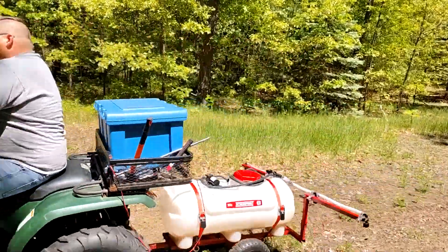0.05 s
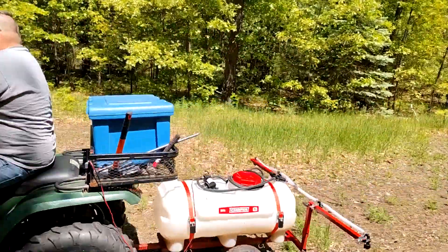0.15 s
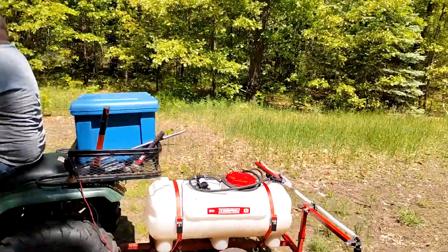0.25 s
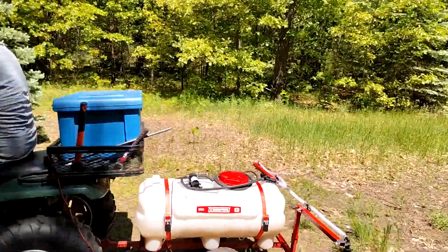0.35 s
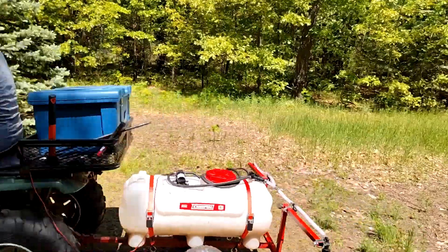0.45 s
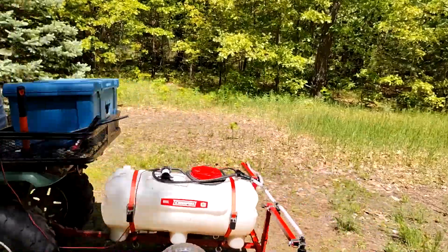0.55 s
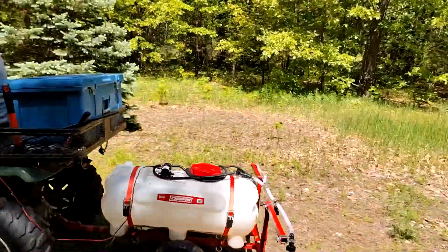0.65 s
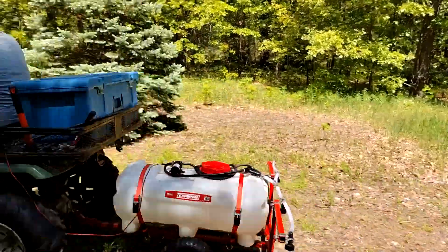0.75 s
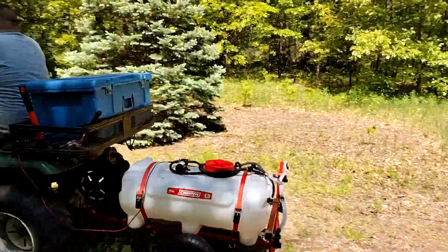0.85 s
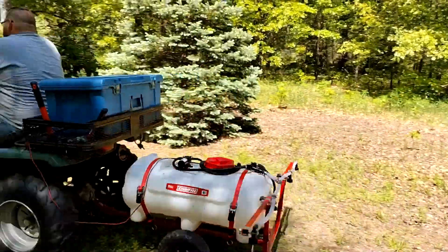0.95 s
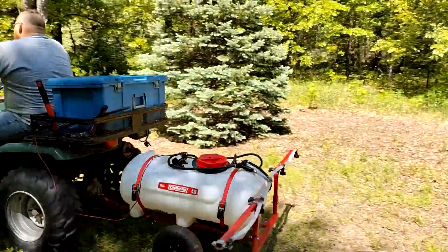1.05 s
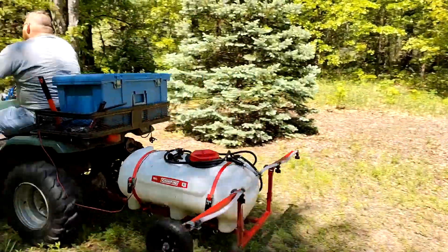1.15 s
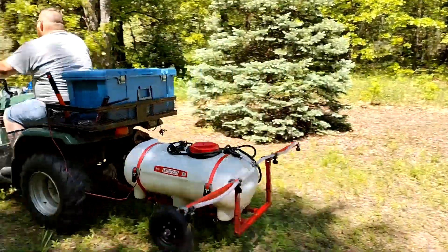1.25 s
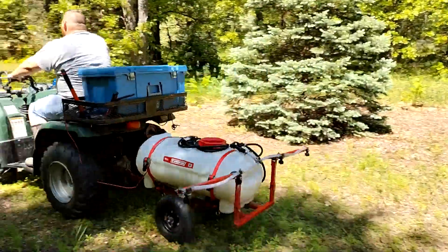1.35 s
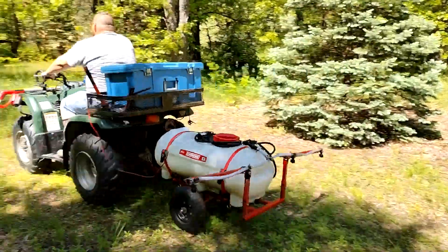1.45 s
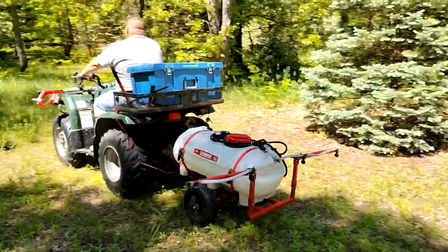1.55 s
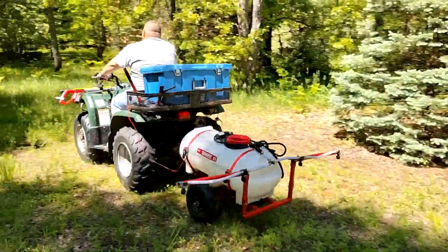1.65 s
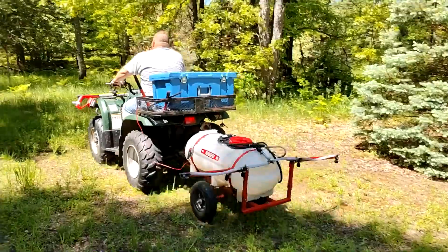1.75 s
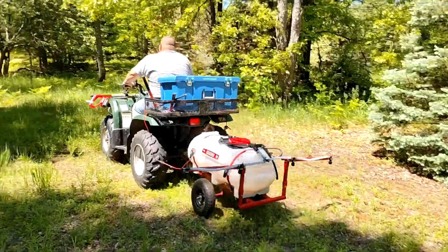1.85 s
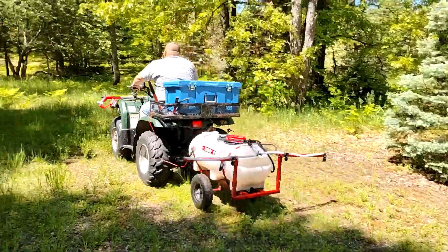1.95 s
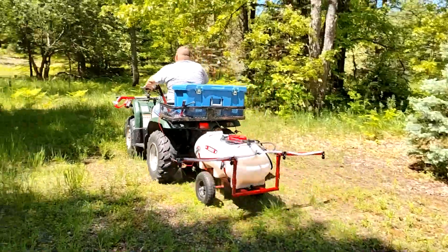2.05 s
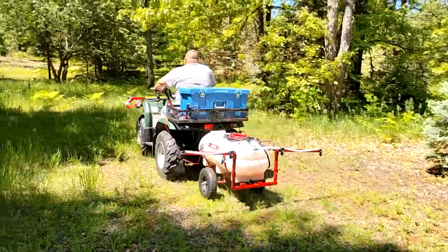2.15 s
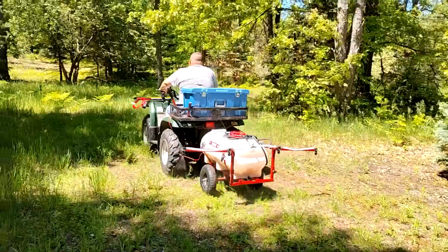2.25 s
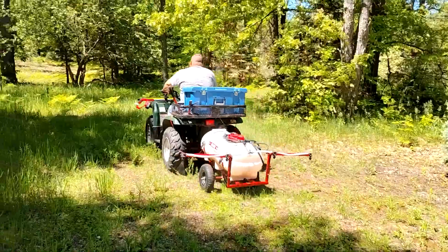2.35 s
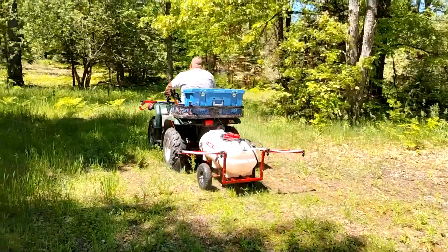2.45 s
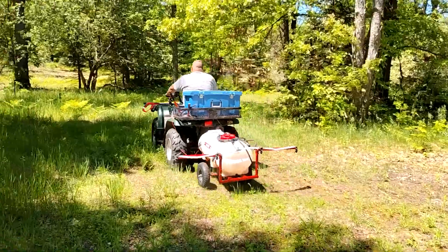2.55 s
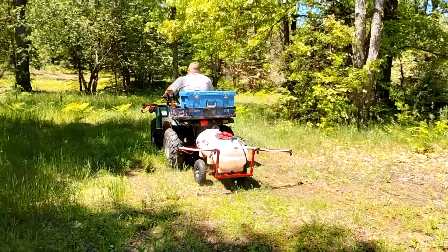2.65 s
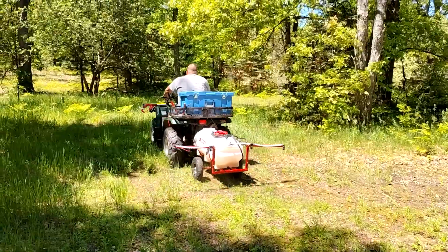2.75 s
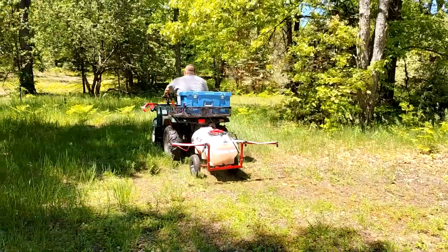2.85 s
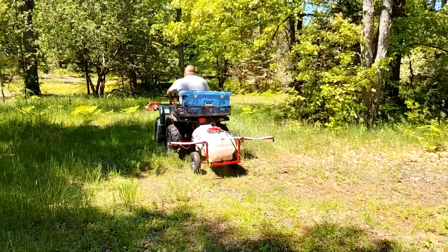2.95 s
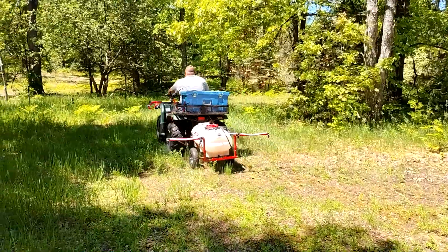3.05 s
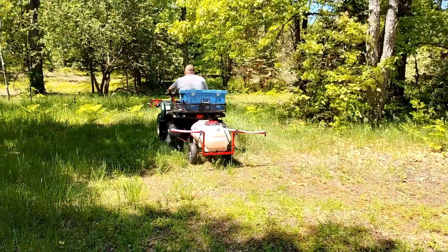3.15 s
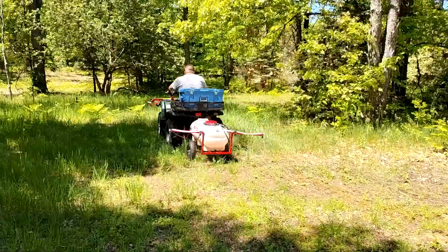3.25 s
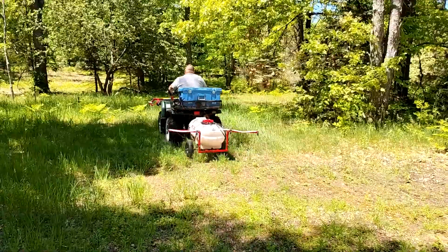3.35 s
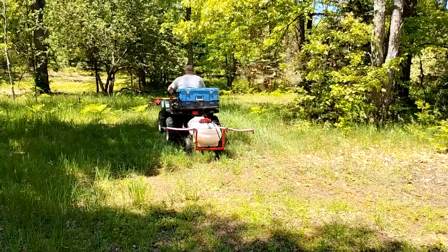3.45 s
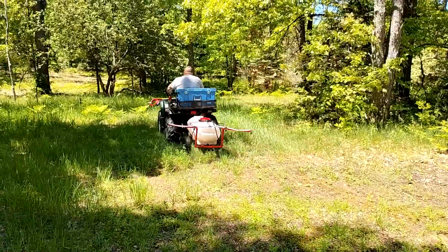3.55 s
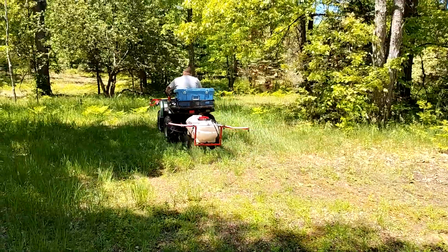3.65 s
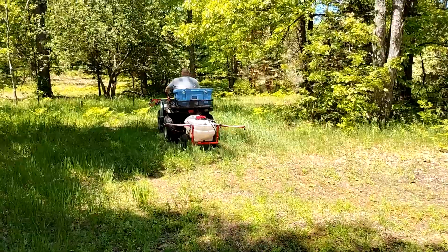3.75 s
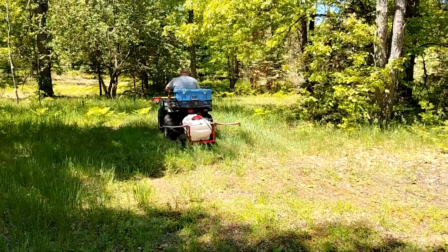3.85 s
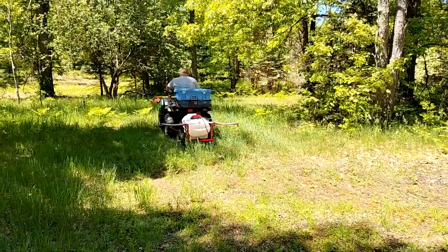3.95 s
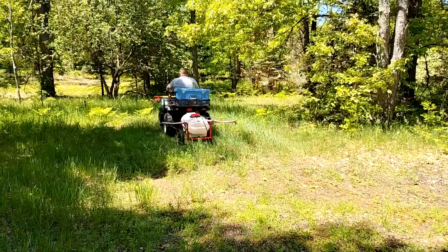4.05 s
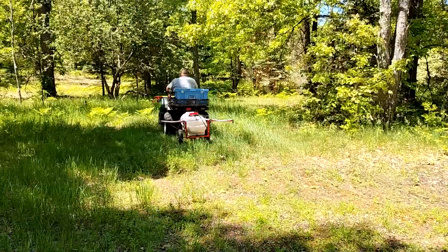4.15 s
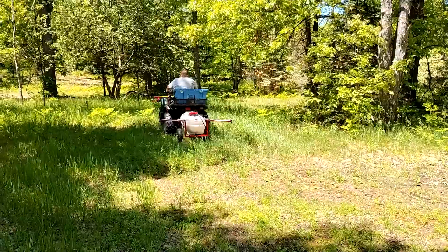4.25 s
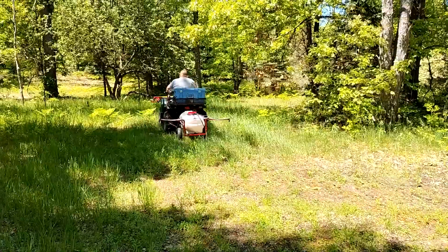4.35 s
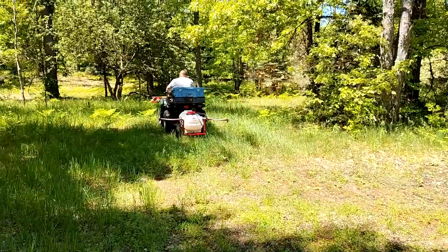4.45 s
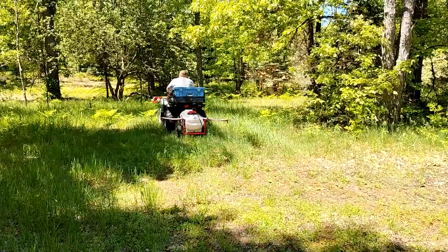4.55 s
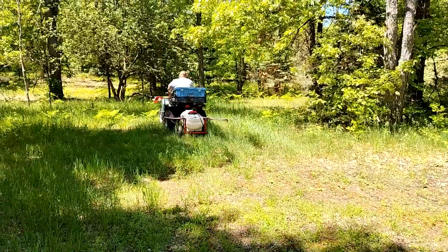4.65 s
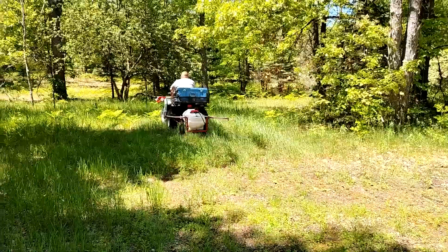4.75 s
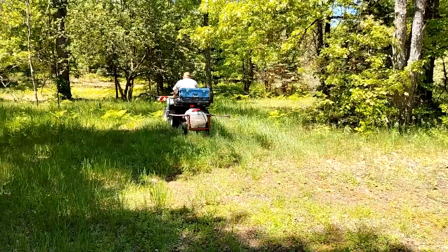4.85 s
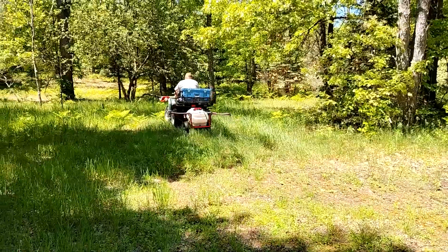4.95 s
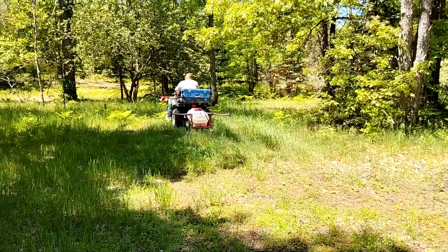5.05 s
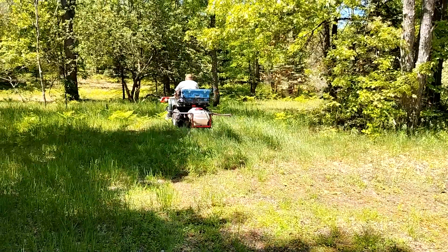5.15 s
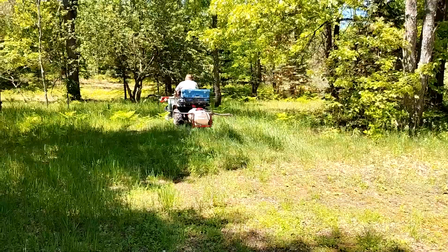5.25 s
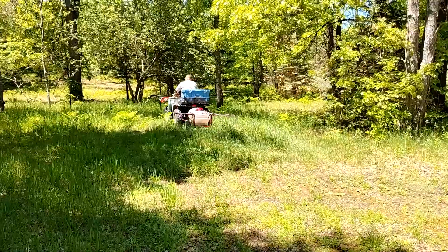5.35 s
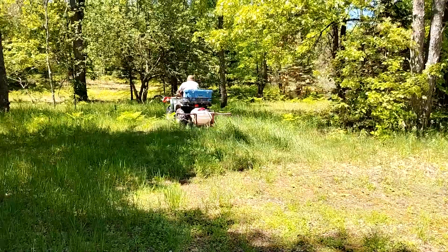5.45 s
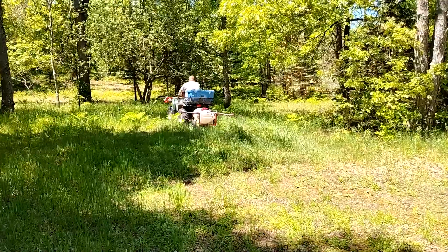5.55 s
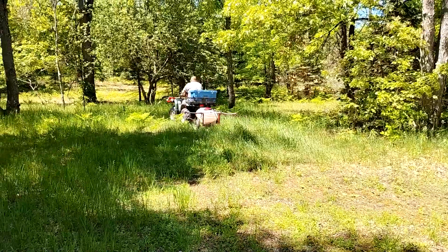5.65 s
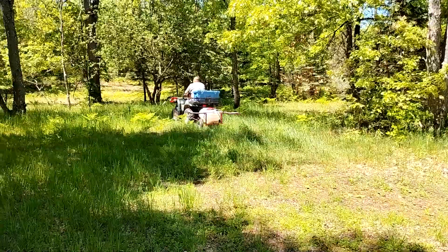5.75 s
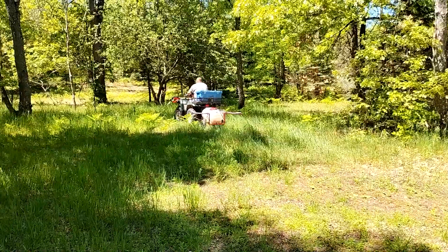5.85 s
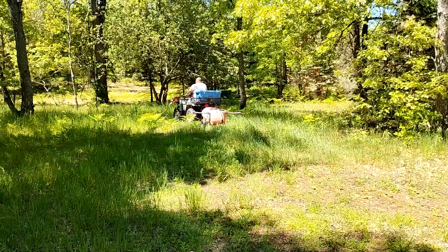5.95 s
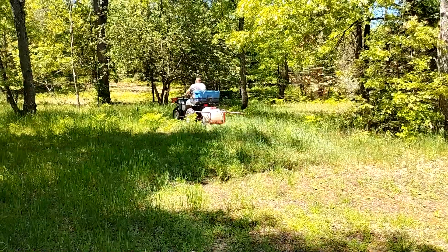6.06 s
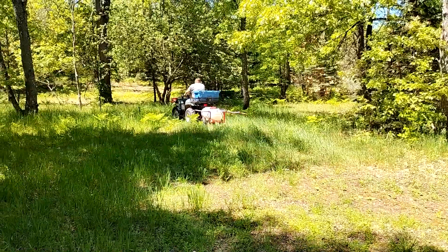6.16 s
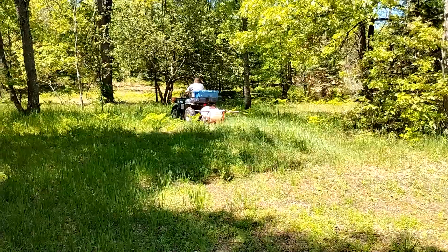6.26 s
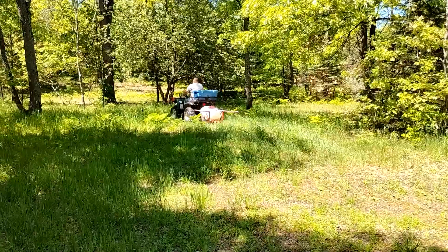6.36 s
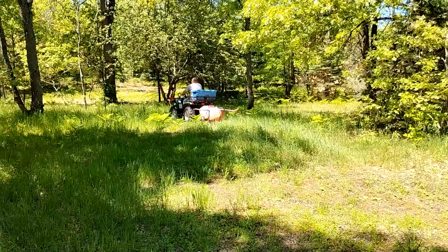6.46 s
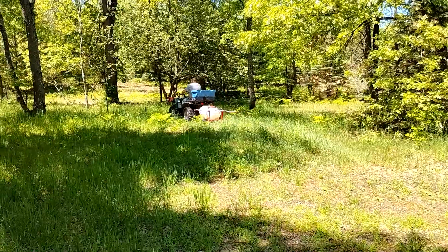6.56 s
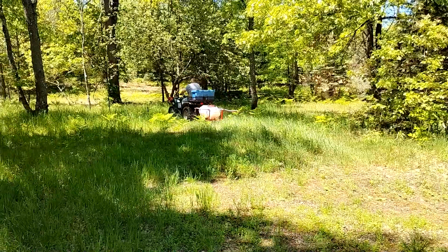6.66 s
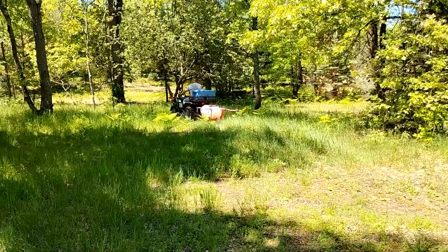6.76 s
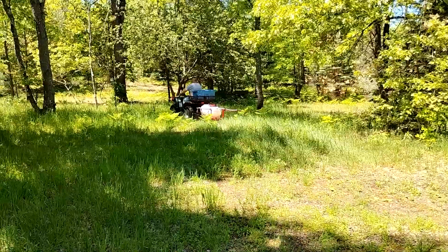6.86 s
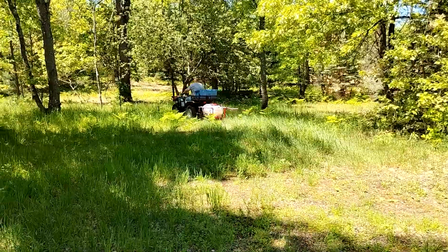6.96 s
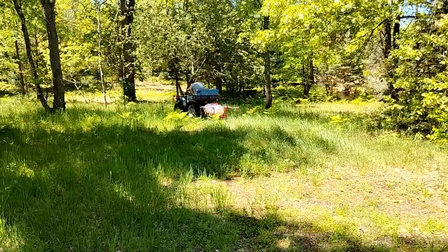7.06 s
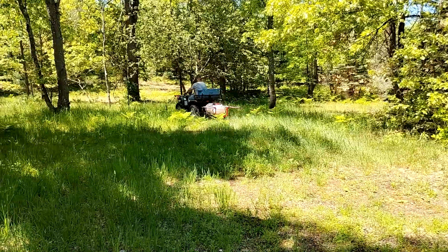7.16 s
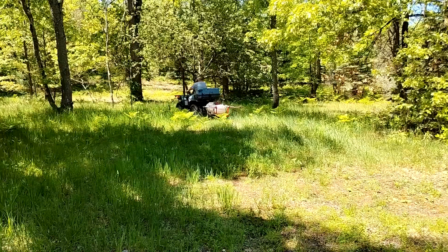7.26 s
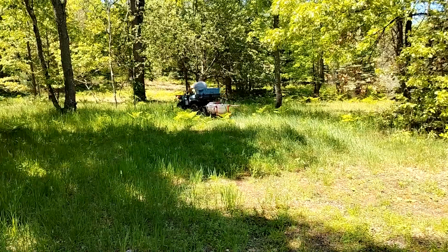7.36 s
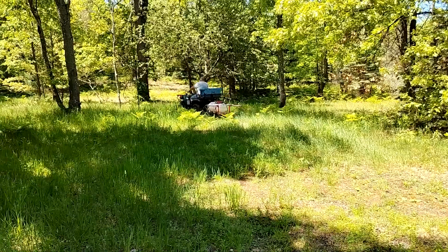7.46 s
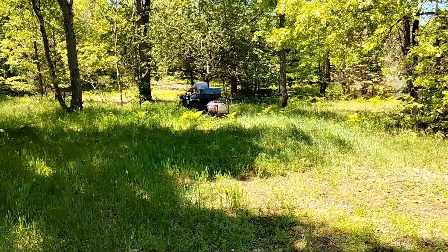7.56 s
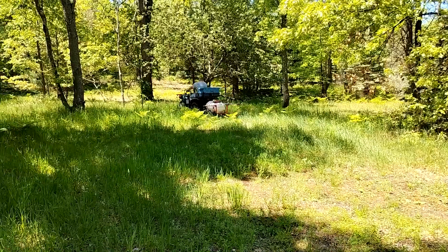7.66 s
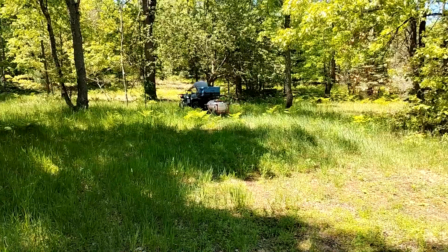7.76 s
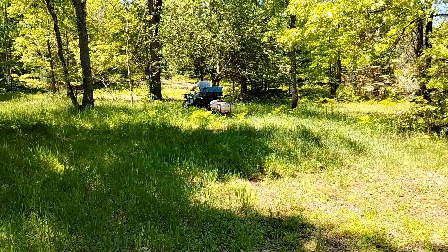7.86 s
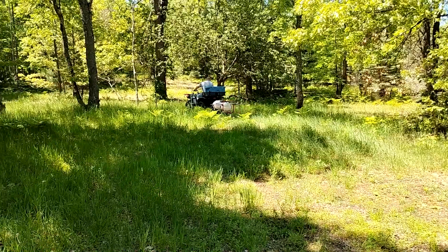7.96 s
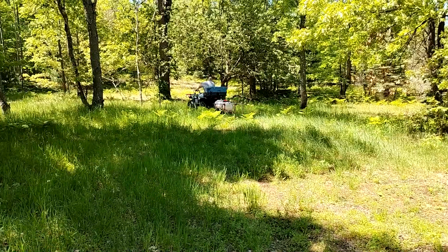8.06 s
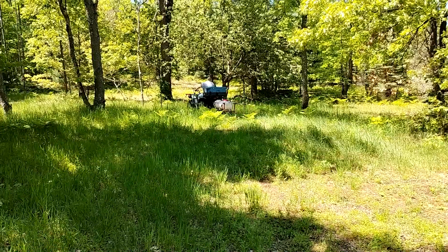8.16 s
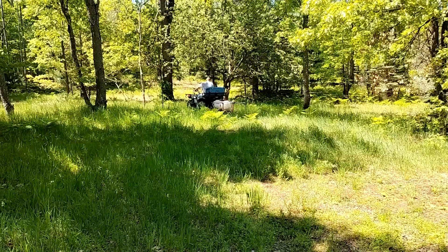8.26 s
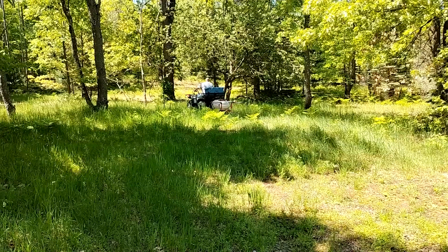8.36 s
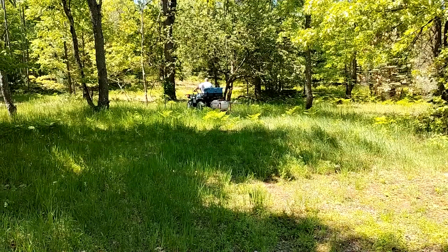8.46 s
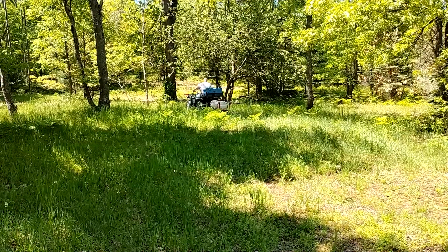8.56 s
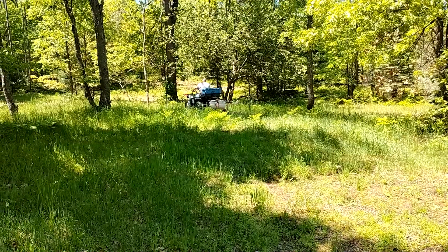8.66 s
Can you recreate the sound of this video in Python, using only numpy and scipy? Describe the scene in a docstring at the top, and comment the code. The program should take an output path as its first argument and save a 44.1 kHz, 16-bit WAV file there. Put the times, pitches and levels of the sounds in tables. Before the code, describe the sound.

A quad bike putters past close by, towing a clanking, rattling metal trailer over grass, then fades into the distance.

```python
"""On a meadow a single-cylinder quad bike tows a small steel trailer away from a phone with two microphone ports.
Each firing sends pressure pulses through silencer resonances: a boom, a short bark and rasping gas.
Shaped noise makes casing drone, valve clatter, belt churr, tyre wash and rumble; wavering sines are the gears.
The loose trailer clanks and rattles: scrape bursts excite noise and the ringing modes of a steel frame."""
import sys
import numpy as np
from scipy import signal
from scipy.fft import rfft, irfft
from scipy.io import wavfile
from scipy.ndimage import uniform_filter1d, map_coordinates

SR = 44100
rng = np.random.default_rng(int(sys.argv[2]) if len(sys.argv) > 2 else 0)


def master(y):
    """Save y as 16-bit WAV."""
    cut = np.clip(np.atleast_2d(y).T, -1, 1)
    pcm = np.round(cut * 32767)  # scale
    wavfile.write(sys.argv[1], SR, pcm.astype(np.int16))


N = 384552

# Noise colours: (frequency [Hz], relative density [dB])
RUMBLE_COLOUR = [(15, -21), (25, -19), (40, -11), (55, -8), (70, -5), (85, 1.5), (110, -33.5)]  # tyres on turf
WASH_COLOUR = [(2500, 2.5), (3200, 2.5), (4000, -7), (4500, -1), (5200, 2.5), (6200, -2.5), (7000, -11.5),
               (8000, -39.5)]  # tyre hiss
DRONE_COLOUR = [(200, -41), (300, 0), (420, 3), (500, 3), (590, -1.5), (700, 2), (900, -0.5), (1150, -22)]  # engine casing
CLATTER_COLOUR = [(600, -35), (780, -11), (1000, -6), (1230, -11), (1530, -2), (1780, -6), (2110, 2),
                  (2350, -6), (2600, -3), (2900, -10), (3300, -18), (4200, -22), (5500, -45)]  # valves, and the knock of the trailer
CHURR_COLOUR = [(550, -31.5), (680, -7.5), (800, -5.5), (1000, 0.5), (1180, -9.5), (1380, -1), (1600, -39),
                (1900, -43)]  # drive belt
SIZZLE_COLOUR = [(6500, -38), (7500, -19), (7800, -2.5), (8300, -2), (8850, -6), (9150, -22.5),
                 (10000, -8.5), (11000, -25.5)]  # bright hiss in two bands
JANGLE_COLOUR = [(3000, -42.5), (3600, -12.5), (4400, -15), (5600, -16), (6300, -9), (7000, -5.5),
                 (7500, -6), (8100, -1.5), (8800, -6.5), (9250, -9), (10000, -10), (10800, -14.5),
                 (11800, -17.5), (13000, -20.5), (14100, -28)]  # loose steel
RASP_COLOUR = [(70, -16), (110, -28), (170, -2), (220, 2.5), (330, -0.5), (440, -8), (530, -48)]  # gas behind each firing
# Port colouring: (frequency [Hz], left minus right [dB])
PORT_DIFFERENCE = [(500, 0), (1000, -3), (1500, -4), (2100, 0.12), (2700, 5.32), (3500, -2), (5000, 0.15),
                   (6300, 0.1), (7000, 3.9), (8300, 12.4), (10000, 12.7), (12000, 12), (13300, 0.9),
                   (14200, 2.78)]
# Likeness of noise at the two ports: (frequency [Hz], correlation [0-1])
PORT_LIKENESS = [(30, 0.93), (70, .99), (300, 0.99), (550, .94), (800, 0.85), (1200, 0.74), (2200, 0.66),
                 (3500, .42), (6000, .3), (9000, 0.1)]
# Quad drawing away: (time [s], relative boom level [dB], fade of the running gear [dB])
AWAY = [(0, -15, -1), (.6, -18, -1.5), (1.2, -18.5, -2), (1.9, -18.5, -6.5), (2.4, -17.5, -7.5),
        (2.9, -18.5, -11), (3.3, -22, -13.5), (3.7, -23.5, -16), (4.2, -28, -21.5), (4.8, -28.5, -28),
        (5.4, -30.5, -21.5), (6.2, -31.5, -24), (7.4, -32.5, -24), (8.66, -35, -27.5)]
# Quad turning its tail to the phone: (time [s], lead of the left port [ms], tail pipe shading [dB],
# low-mid lift [dB], growl lift [dB], stereo width [dB])
BEARING = [(0, 0.25, -8, 1, 9.5, 6.5), (.4, 0.21, -11, 4, 7.5, 6.5), (.8, 0.26, -13.5, 8, 9, 7),
           (1.2, 0.17, -1.5, 7, 0.5, 2.5), (1.65, 0.024, -6.5, 9.5, 0.5, 2), (2.5, .02, -1, 2, -2, -1),
           (3.5, -0.074, -1, 3, 0, 2.5), (4.15, -0.0098, 2, 4.5, 1, 2), (4.9, -0.027, 0, 1.5, -2, 0.5),
           (5.6, -0.044, -3, 4.5, 6, 2.5), (6.7, 0.066, 1.5, 3, 3, 1.5), (8.66, -0.069, -3, 5.5, 1, 3)]
# Rough ground that shakes everything loose: (centre [s], half length to 1/e [s], rise [dB])
ROUGH_GROUND = [(1.015, 0.11, 0), (2.306, 0.18, 3.5), (4.599, 0.13, 10.5), (5.09, 0.16, 6.5),
                (6.669, 0.15, 14)]
# Gear whine: (time [s], pitch [Hz], relative level [dB])
GEAR_WHINE = [(0, 1065, -23), (.12, 1061, -38), (.3, 1055, -32), (.5, 1065, -26), (.56, 1040, -28),
              (.61, 1098, -35), (.78, 1110, -28), (.95, 1143, -41.5), (1.05, 1157, -55), (2.25, 1030, -63),
              (2.4, 1015, -35.5), (2.5, 1008, -43), (2.7, 1015, -34.5), (2.85, 1040, -46), (2.95, 999, -33),
              (3.1, 990, -36), (3.25, 998, -35.5), (3.58, 970, -36), (3.66, 967, -48), (3.9, 958, -43),
              (3.97, 945, -50), (4.2, 917, -60), (8.66, 900, -80)]
# Two lower gear tones, heard only from the side, each: (time [s], pitch [Hz], relative level [dB])
LOW_GEAR_WHINES = [
    [(0, 660, -52), (.2, 721, -33), (.35, 680, -39), (.5, 650, -56), (.7, 686, -33), (.8, 664, -29),
     (1, 662, -41), (1.25, 660, -77), (1.5, 660, -100)],
    [(0, 960, -67), (.33, 962, -56), (.43, 995, -29), (.55, 984, -34), (.7, 1000, -37), (.9, 990, -68.5),
     (1.1, 995, -100)],
]
# Trailer clanks: (time [s], relative peak [dB], knock over jangle [dB], relative burst length [ms],
# pitch near which the struck member rings [Hz])
CLANKS = [(0.278, -25, 2, 7.7, 1780), (0.328, -11, -7.5, 4, 1780), (0.6166, -17.5, -13, 9.8, 1950),
          (0.663, -16, -24, 2.7, 1700), (0.941, -4, -13.5, 2.3, 2080), (0.999, -35, -6, 7.8, 2060),
          (1.0884, -8.5, -9, 5.5, 2200), (1.2001, 1.5, -17.5, 2.5, 1780), (1.387, -16, -9, 14.3, 2230),
          (1.4442, -20.5, -16, 11, 1650), (1.482, -24, -9, 6, 2100), (1.505, -17, -9, 8, 2210),
          (1.619, -44, 2, 5.4, 1600), (1.6625, -15.5, -5.5, 6.9, 2380), (1.883, -48, -2, 3.6, 1300),
          (1.942, -1.5, -9.5, 4.3, 1995), (1.9815, -12, -14, 6.7, 2140), (2.005, -15, -13, 8.8, 2160),
          (2.028, -5.5, -12, 4.1, 2200), (2.074, -21.5, -4.5, 7.9, 1480), (2.134, -11, -16, 4.9, 1970),
          (2.193, -22, -11, 5, 2100), (2.265, -26, -15, 6.0, 1500), (2.311, -14.5, -13, 7.7, 2080),
          (2.374, -8, -22, 4.3, 1498), (2.435, -10, -11.5, 6.1, 2210), (2.5, -36, -0.0, 5.4, 2370),
          (2.53, -14, -17, 6.9, 1800), (2.5557, -10.5, -18, 2.8, 2400), (2.6647, -22, -12, 6.8, 1390),
          (2.697, -21, -16, 4.3, 1820), (2.764, -8, -14.5, 3.1, 2340), (2.926, -25.5, -8, 5.7, 2130),
          (3.1058, -20, -15, 12.4, 2440), (3.179, -30, -18, 5.8, 1790), (3.238, -20.5, -15, 9.1, 1750),
          (3.637, -35, -6, 6.0, 1070), (3.739, -30.5, -17, 8.5, 1070), (3.894, -26.5, -9.5, 8.2, 2231),
          (3.962, -44, 1, 5.3, 2080), (4.122, -48, 5, 6.0, 1404), (4.249, -36.5, -10, 8.2, 1395),
          (4.366, -29.5, -9, 7.5, 1280), (4.488, -32, -11.5, 12, 1470), (4.502, -32, -12, 7.8, 2060),
          (4.591, -27.5, -14.5, 10.5, 2170), (4.624, -27, -20, 6.1, 2560), (4.665, -36.5, -8.5, 16, 1060),
          (4.701, -43, 0.5, 9.1, 1480), (4.756, -49.5, 9, 4.1, 1440), (4.818, -42, -1, 7, 1500),
          (4.957, -33.5, -8.5, 10, 2510), (4.994, -32.5, -18, 23, 2660), (5.0524, -34.5, -10.5, 24, 2150),
          (5.2, -25.5, -14, 6.7, 2540), (5.263, -29, -13.5, 8.6, 2580), (5.2843, -33, -25, 8.9, 2270),
          (5.3048, -29.5, -10, 10, 2110), (5.347, -27, -20, 11.5, 1970), (5.441, -34.5, -11, 12, 1940),
          (5.7323, -28, -9.5, 4.6, 2120), (5.7772, -39.0, -15, 12, 1940), (6.1237, -38, -6, 6, 2000),
          (6.1894, -37, -18, 3.7, 1520), (6.4485, -33.5, -6.5, 10, 2460), (6.527, -25.5, -12, 8.2, 2230),
          (6.578, -27.5, -16, 7.6, 2640), (6.61, -36, -13, 5.4, 1990), (6.6758, -29, -12, 8.6, 2520),
          (6.79, -36, -18, 8.1, 1410), (6.806, -34, -13, 15.5, 2600), (7.025, -35, -8.5, 6.8, 2540),
          (7.193, -35.5, -8.5, 13, 2100), (7.211, -38, -12.0, 6.9, 2050), (7.463, -52, -2, 7.2, 2130),
          (7.6766, -45, -3, 5.6, 2510), (8.0253, -35, -6.5, 4.9, 2070), (8.5048, -36.5, -6.5, 5.9, 2030),
          (8.611, -40.5, -6.5, 23, 2540)]
# Steel frame modes: (frequency [Hz], relative level [dB], ring time to -60 dB [s])
FRAME_MODES = [(1070, -7, .06), (1290, -6, .07), (1390, -8, .09), (1480, -5, .07), (1600, -9, .06),
               (1780, -7, .06), (1950, -3, .06), (2100, -1, .07), (2150, -1, .07), (2230, -4, .06),
               (2380, -6, .06), (2540, -6, .05), (2640, -8, .04), (3200, -12, .04), (6600, -6, .03),
               (7300, 0, .03), (8050, 0, .04), (8500, -3, .04), (10100, -8, .03)]
# Engine speed: (time [s], firing rate [Hz])
FIRING_RATE = [(0.0, 27.58), (0.3, 27.04), (0.6, 27.61), (0.9, 27.65), (1.2, 27.07), (1.5, 26.77),
               (1.8, 27.12), (2.1, 26.71), (2.4, 25.37), (2.7, 25.85), (3.0, 25.42), (3.3, 25.3),
               (3.6, 25.01), (3.9, 24.52), (4.2, 24.16), (4.5, 24.28), (4.8, 23.94), (5.1, 24.4),
               (5.4, 23.59), (5.7, 23.2), (6.0, 23.18), (6.3, 23.14), (6.6, 23.56), (6.9, 23.27),
               (7.2, 23.86), (7.5, 23.24), (7.8, 22.9), (8.1, 23.56), (8.4, 23.15), (8.72, 24.0)]
# Hum on a multiple of the firing rate: (time [s], level before its waver [dB])
ENGINE_HUM = [(0, -55), (1, -50), (1.25, -32), (1.6, -40.5), (1.8, -35), (2, -32.5), (2.4, -35.5), (3, -49),
              (3.5, -56), (4.5, -46), (5, -70), (8.66, -62)]
# Bark coming back off trailer, ground and trunks: (delay [ms], level before its drift [dB])
SCATTER = [(7, -8), (17, -5), (24, -7), (31, -6.5), (47, -10)]

# Noise levels: (level before any fade [dB], dB per dB of running-gear fade)
RUMBLE_LEVEL, WASH_LEVEL, DRONE_LEVEL = (-28.5, 1.21), (-24.5, 2.11), (-26, 1.49)
CLATTER_LEVEL, SIZZLE_LEVEL, RATTLE_LEVEL = (-25.5, 1), (-37, 0.65), (-24, 1.323)
FAR_WASH_DB = -60.5  # grass keeps rustling once the tyres are out of earshot
ROUGH_CLATTER, ROUGH_WASH = 0.49, 0.78  # share of the rough-ground rise
LOAD_ENDS_S = 4.56  # churr and sizzle die faster from here
CHURR_DIES_DB_PER_S, SIZZLE_DIES_DB_PER_S = 13, 6
PATCHY_DB = 2.0  # spread of the flutter in each narrow band
BOUNCE_MS, BOUNCE_DB = (5, 16), (-2, -12)  # ranges of delay and level for the one bounce of each clank

# Resonances: (centre [Hz], width [Hz])
HEADER, CHAMBER, TAIL_PIPE = (160, 102), (110.2, 9), (223, 50)
LOW_MIDS, GROWL, SUB = (195, 80), (325, 35), (92.6, 8.3)
TAIL_PIPE_DB, SUB_LIFT_DB = -0.5, 2.1
BOOM_LAG_MS = .4
BARK_HALF_WIDTH_MS = 1.323  # slug of gas at the outlet, centre to zero crossing
ECHO_MS, ECHO_GAIN = 12.9, -0.3  # the slug returns inverted from the silencer's far end
BARK_DB, RASP_DB, CHURR_DB, CRANK_DB = -5, -15.5, -19, -31  # relative to the boom
SCATTER_DRIFT_DB = 4  # each echo swells and sinks as the quad moves
HUM_ORDER = 10
BASS_LEAD = .7  # share of the port lead that is left in the exhaust note

AIR_HZ, AIR_SHARE = 10980, 0.54  # above this the air takes a further share of the fade
END_S, TOP_HZ = 8.659, 15466


def undb(db):
    """Gain of a level in dB."""
    return 10 ** (np.asarray(db) / 20)


def unit(x):
    """Scaled to rms 1."""
    return x / np.sqrt(np.mean(x ** 2))


def curves(table):
    """Each column of a timed table as one value a sample."""
    s, *columns = np.transpose(table)
    return [np.interp(np.arange(N) / SR, s, c) for c in columns]


def over_hz(table):
    """A frequency table read at every bin, straight on a log axis."""
    hz, value = np.transpose(table)
    bins_hz = np.arange(N // 2 + 1) * SR / N
    return np.interp(np.log(bins_hz + 1), np.log(hz), value)


def walk(rate):
    """Random levels held 1 / rate s and smoothed twice, with rms 1."""
    k = int(SR / rate)
    steps = np.repeat(rng.standard_normal(N // k + 1), k)
    return unit(uniform_filter1d(uniform_filter1d(steps, k), k)[:N])


def hiss(colour):
    """Coloured noise at both ports, alike in the bass and nearly unrelated in the treble."""
    mid, side = rfft(rng.standard_normal((2, N)))
    alike = np.clip(over_hz(PORT_LIKENESS), 0, 1)
    pair = np.sqrt(1 + alike) * mid + np.sqrt(1 - alike) * side * np.array([[1], [-1]])
    return unit(irfft(pair * undb(over_hz(colour)), N))


def ring(x, hz, width_hz):
    """Two-pole resonance, gain 1 at the centre."""
    return signal.lfilter(*signal.iirpeak(hz, hz / width_hz, fs=SR), x)


def lift(x, db, hz, width_hz):
    """Raises or lowers one resonant band by db."""
    return x + (undb(db) - 1) * ring(x, hz, width_hz)


def highpass(x, order, hz):
    """Removes what lies below hz, run both ways so that nothing is delayed."""
    return signal.sosfiltfilt(signal.butter(order, hz, "highpass", fs=SR, output="sos"), x)


def delayed(x, ms):
    """Shifted later by ms, wrapping round the end."""
    return np.roll(x, int(ms * SR / 1000))


def patchy(x, db):
    """Lets narrow bands swell and drop on their own, so that the colour shifts and flutters."""
    bands = signal.stft(x, nperseg=512)[2]
    field = rng.standard_normal(bands.shape[1:])
    field = uniform_filter1d(uniform_filter1d(field, size=3, axis=0), size=4, axis=1)
    return signal.istft(bands * undb(db * unit(field)), nperseg=512)[1][:, :N]


def place(pair, lead_ms, width_db):
    """Widens a pair and lets the left port hear it earlier by the lead."""
    mid = (pair[0] + pair[1]) / 2
    side = undb(width_db) * (pair[0] - pair[1]) / 2
    shift = lead_ms * SR / 2000  # half the lead on each port, in samples
    return np.array([map_coordinates(mid + k * side, [np.arange(N) + k * shift], mode="mirror")
                     for k in (1, -1)])


def tyre_rumble(db):
    """Low noise of tyres rolling on turf."""
    return undb(db) * hiss(RUMBLE_COLOUR)


def tyre_wash(db):
    """Tyres hissing through grass, wavering slightly."""
    return undb(db + 1.2 * walk(30)) * hiss(WASH_COLOUR)


def casing_drone(db, throb):
    """Noise from the engine casing that swells a little with each firing."""
    return undb(db + 1.2 * walk(18)) * (1 + .2 * throb) * hiss(DRONE_COLOUR)


def valve_clatter(db, throb):
    """Fast-flickering noise that swells a little with each firing."""
    return undb(db + 1.2 * walk(120)) * (1 + .15 * throb) * hiss(CLATTER_COLOUR)


def belt_churr(db):
    """Steady mid-band noise of the drive belt."""
    return undb(db) * hiss(CHURR_COLOUR)


def sizzle(db):
    """Bright hiss with a flickering level."""
    return undb(db + 3.1 * walk(60)) * hiss(SIZZLE_COLOUR)


def gear_whine(table):
    """A gear tone whose level and phase waver."""
    hz, db = curves(table)
    phase = 2 * np.pi * np.cumsum(hz) / SR + .95 * walk(50)
    return undb(db + 2.8 * walk(25) - 2.5) * np.sqrt(2) * np.sin(phase)


def machinery(turns, drone_db, clatter_db, wash_db, churr_db):
    """Running-gear noises flutter together, with the gear tones on top."""
    throb = np.cos(2 * np.pi * (turns - .15))
    noise = casing_drone(drone_db, throb) + valve_clatter(clatter_db, throb)
    noise = noise + tyre_wash(wash_db) + belt_churr(churr_db)
    tones = sum(gear_whine(table) for table in [GEAR_WHINE, *LOW_GEAR_WHINES])
    return undb(-1.46) * patchy(noise, PATCHY_DB) + tones


def bursts(times, peak, length_ms, tail):
    """Envelope of short scrapes: a quick rise, an exponential fall and an optional longer shiver."""
    env = np.zeros(N + SR)
    for s, a, tau in zip(times, peak, np.clip(length_ms, 1, 20)):
        ms = np.arange(int(tau * SR / (40 if tail else 140))) * 1000 / SR
        rise = 1 - np.exp(-ms / 0.99)
        fall = np.exp(-ms / tau) + tail * np.exp(-ms / (3.62 * tau))
        i = int(s * SR)
        env[i:i + len(ms)] += a * rise * fall
    return env[:N]


def bouncing_clanks():
    """Every clank followed by one weaker bounce, as columns like those of the clank table."""
    s, db, knock_db, ms, struck_hz = np.transpose(CLANKS)
    gap, drop = rng.random((len(s), 2)).T
    s = np.r_[s, s + np.interp(gap, [0, 1], BOUNCE_MS) / 1000]
    db = np.r_[db, db + np.interp(drop, [0, 1], BOUNCE_DB)] - 2.0
    return s, db, *np.tile([knock_db, 0.92 * ms, struck_hz], 2)


def random_rattle(rattle_db):
    """Envelope of 600 small blows at random times and strengths."""
    when, size, short = rng.random((600, 3)).T
    peak = undb(rattle_db[(when * N).astype(int)] - 9.5 - 3.9 * np.log(1 - .97 * size))
    return bursts(when * N / SR, peak, 3 + 6 * short, 0)


def frame_ring(s, db, knock_db, ms, struck_hz):
    """Each blow scrapes the steel frame and sets its modes ringing, the struck member most."""
    scrape = hiss([(500, 0.0017), (15000, 0.014)])  # practically white
    out = np.zeros((2, N))
    for hz, mode_db, t60 in FRAME_MODES:
        if hz < 4000:
            part_db = knock_db + 7.5 + 10.7 * np.exp(-((hz - struck_hz) / 70) ** 2)
        else:
            part_db = -6.0
        # every blow lands elsewhere, so each mode gets its own share of it
        share = undb(mode_db + db + part_db + 4 * rng.standard_normal(len(s)))
        width_hz = np.log(1000) / (np.pi * t60)
        out += 8.4 * ring(bursts(s, share, .5 * ms, 0) * scrape, hz, width_hz)
    return out


def trailer(rattle_db):
    """Clanks of the loose hitch and a dense rattle: bright jangle, duller knock and frame modes."""
    s, db, knock_db, ms, struck_hz = bouncing_clanks()
    rattle = random_rattle(rattle_db)
    jangle = bursts(s, undb(db - 6.5), ms, 0.23) + 0.39 * rattle
    jangle = jangle + 0.51 * undb(rattle_db + 0.95 * walk(34))
    knock = bursts(s, undb(db + knock_db - 6.5), 1.66 * ms, 0.65) + 0.26 * rattle
    chatter = undb(1.44 * walk(250) - 1.75)  # loose steel chatters while it shivers
    noise = chatter * jangle * hiss(JANGLE_COLOUR) + undb(-2.0) * knock * hiss(CLATTER_COLOUR)
    return patchy(noise, PATCHY_DB) + frame_ring(s, db, knock_db, ms, struck_hz)


def firing_pulses(turns):
    """Three impulse trains, one pulse per firing, slightly uneven in timing and strength."""
    at = np.flatnonzero(np.diff(np.floor(turns), prepend=0))
    late, size, sharp, back = rng.standard_normal((len(at), 4)).T
    at = np.clip(at + (0.00011 * SR * late).astype(int), 0, N - 1)
    pulses = np.zeros((3, N))
    pulses[:, at] = -undb([1.4 * size, .9 * size + 1.5 * sharp, .9 * size + 1.6 * back])
    return pulses


def silencer_boom(pulses):
    """Pulses ring the header and then the chamber; the small outlet radiates no deep bass."""
    return highpass(ring(ring(delayed(pulses, BOOM_LAG_MS), *HEADER), *CHAMBER), 3, 60)


def exhaust_bark(pulses, back_pulses):
    """A short slug of gas and its inverted return ring the tail pipe, then scatter back as echoes."""
    u = np.arange(-300, 301) * 1000 / SR / BARK_HALF_WIDTH_MS
    slug = pulses + ECHO_GAIN * delayed(back_pulses, ECHO_MS)
    slug = signal.fftconvolve(slug, (1 - u ** 2) * np.exp(-u ** 2 / 2), "same")
    bark = highpass(slug + undb(TAIL_PIPE_DB) * ring(slug, *TAIL_PIPE), 3, 95)
    return bark + sum(undb(db + SCATTER_DRIFT_DB * walk(4)) * delayed(bark, ms) for ms, db in SCATTER)


def crank_shake(turns):
    """The crank shakes the frame twice per firing."""
    return np.sqrt(2) * np.sin(2 * np.pi * 2 * turns)


def engine_hum(turns):
    """A clear, slightly wavering tone on a multiple of the firing rate."""
    level = undb(curves(ENGINE_HUM)[0] + 0.99 * walk(7.2))
    return level * np.sqrt(2) * np.sin(2 * np.pi * (HUM_ORDER * turns + 0.26))


def gas_rasp(turns, db):
    """Turbulent gas that swells behind each firing."""
    return undb(db) * (1 + .5 * np.cos(2 * np.pi * (turns - .2))) * hiss(RASP_COLOUR)


def exhaust(turns, boom_db, shade_db, lead_ms, mids_db, growl_db):
    """Each firing booms in the chamber, barks at the outlet and rasps; bands shift with the bearing."""
    boom_pulses, bark_pulses, back_pulses = firing_pulses(turns)
    note = undb(boom_db) * unit(silencer_boom(boom_pulses))
    note = note + undb(boom_db + BARK_DB + shade_db) * unit(exhaust_bark(bark_pulses, back_pulses))
    note = note + undb(boom_db + CRANK_DB) * crank_shake(turns)
    note = lift(note, mids_db, *LOW_MIDS)
    note = lift(note, growl_db, *GROWL)
    note = lift(note, SUB_LIFT_DB, *SUB)
    note = note + engine_hum(turns)
    # a small lag between the ports is the slope times the lag
    lag = np.array([[.5], [-.5]]) * lead_ms * SR / 1000 * np.gradient(note)
    return note + lag + lift(gas_rasp(turns, boom_db + RASP_DB), growl_db, *GROWL)


def scene():
    """Tyres, machinery, trailer and exhaust, all fading as the quad leaves."""
    t = np.arange(N) / SR
    boom_db, fade_db = curves(AWAY)
    lead_ms, shade_db, mids_db, growl_db, width_db = curves(BEARING)

    def faded(level):
        """Level in dB following the running-gear fade."""
        return level[0] + level[1] * fade_db

    rough_db = sum(db * np.exp(-((t - s) / half) ** 2) for s, half, db in ROUGH_GROUND)
    # tyre wash and far grass add as powers
    wash_db = 10 * np.log10(undb(2 * faded(WASH_LEVEL)) + undb(2 * FAR_WASH_DB))
    wash_db = wash_db + ROUGH_WASH * rough_db
    clatter_db = faded(CLATTER_LEVEL) + ROUGH_CLATTER * rough_db
    coasting = np.clip(t - LOAD_ENDS_S, 0, None)
    churr_db = boom_db + CHURR_DB - CHURR_DIES_DB_PER_S * coasting
    sizzle_db = faded(SIZZLE_LEVEL) - SIZZLE_DIES_DB_PER_S * coasting
    turns = .64 + np.cumsum(curves(FIRING_RATE)[0]) / SR  # one turn per firing

    rumble = tyre_rumble(faded(RUMBLE_LEVEL))
    gear = machinery(turns, faded(DRONE_LEVEL), clatter_db, wash_db, churr_db) + sizzle(sizzle_db)
    gear = gear + trailer(faded(RATTLE_LEVEL) + rough_db)
    engine = exhaust(turns, boom_db, shade_db, BASS_LEAD * lead_ms, mids_db, growl_db)
    quad = rumble + place(gear, lead_ms, width_db) + engine
    return quad - (1 - undb(AIR_SHARE * fade_db)) * highpass(quad, 2, AIR_HZ)


def record(dry):
    """Each port colours the sound its own way; peaks are rounded, the top is cut, the end is abrupt."""
    ports = irfft(rfft(dry) * undb(np.outer([.5, -.5], over_hz(PORT_DIFFERENCE))), N)
    ports = ports / (1 + np.abs(ports / .97) ** 6) ** (1 / 6)
    ports = signal.sosfilt(signal.ellip(8, .3, 45, 14350, fs=SR, output="sos"), ports)
    ports = ports * np.clip((END_S - np.arange(N) / SR) / 0.0017, 0, 1)
    return signal.sosfilt(signal.ellip(8, .2, 70, TOP_HZ, fs=SR, output="sos"), ports)


dry = scene()
out = record(dry)
master(out)
```